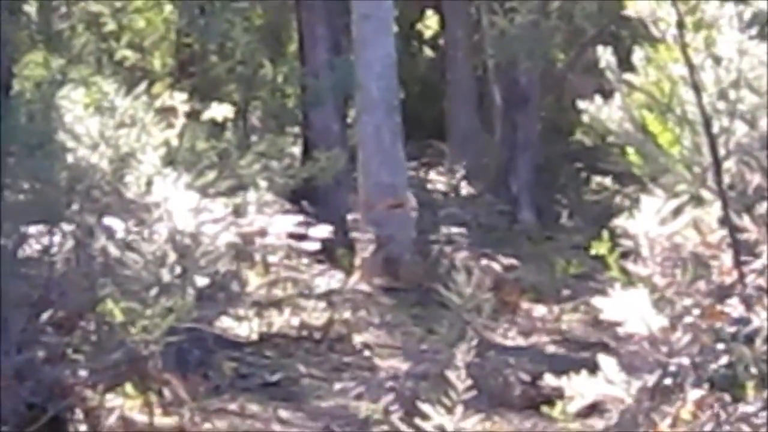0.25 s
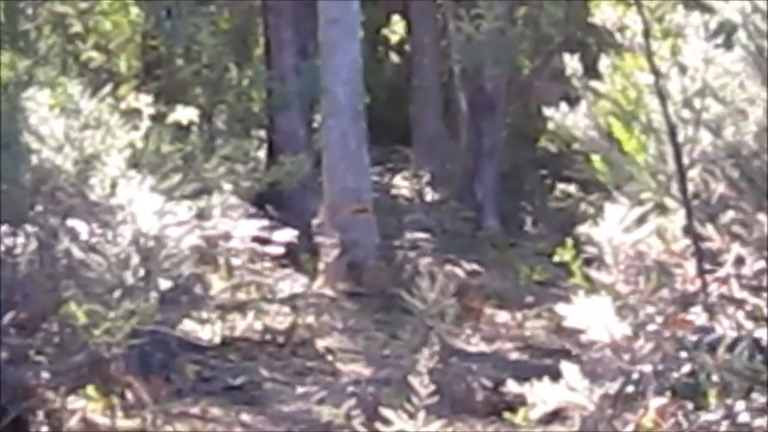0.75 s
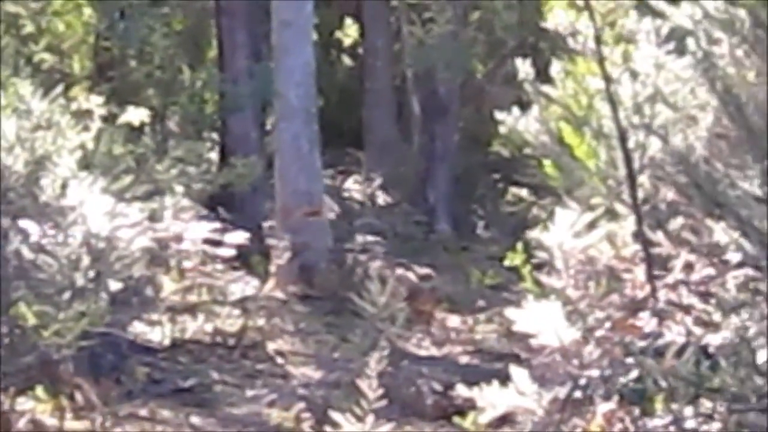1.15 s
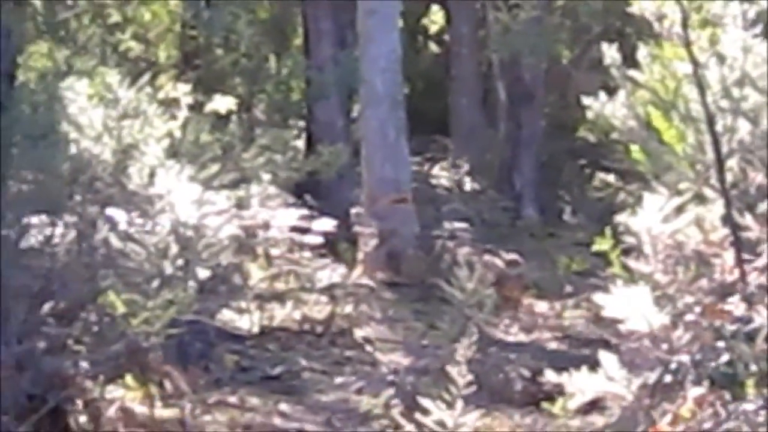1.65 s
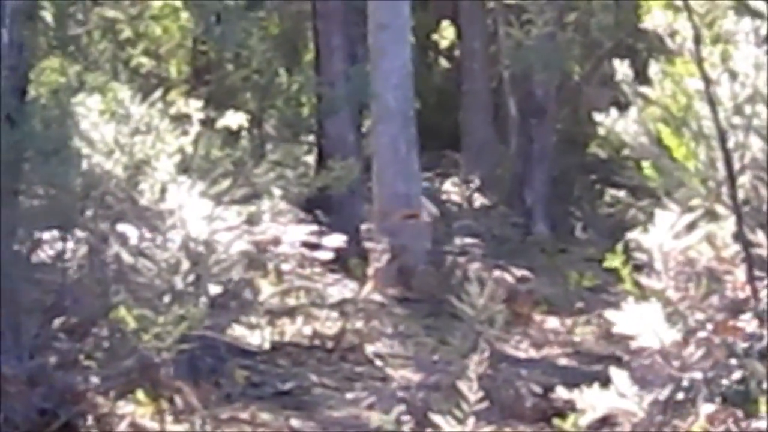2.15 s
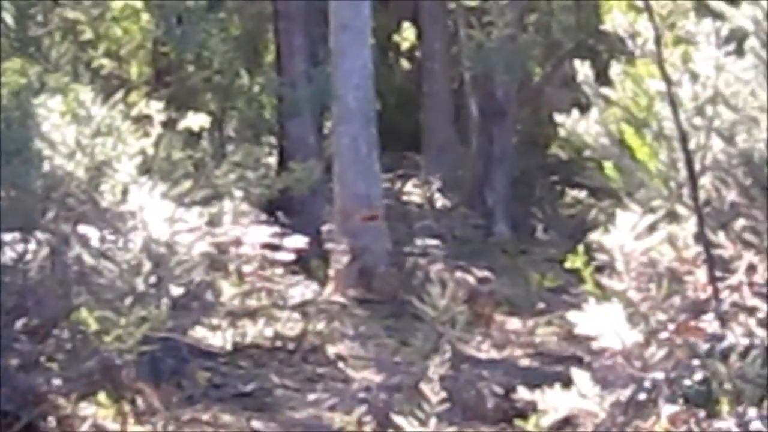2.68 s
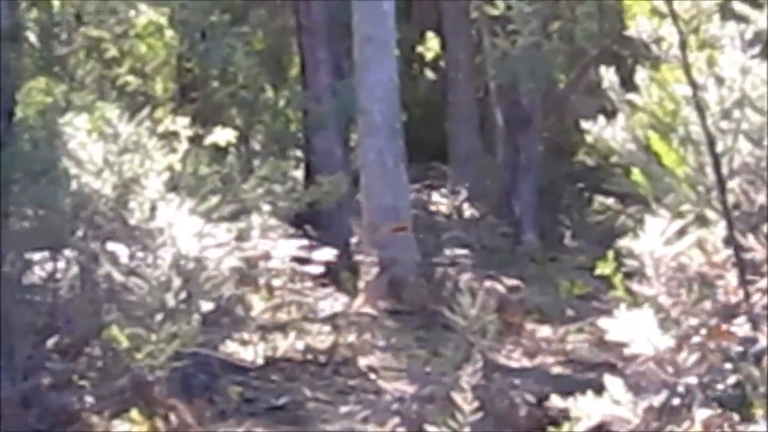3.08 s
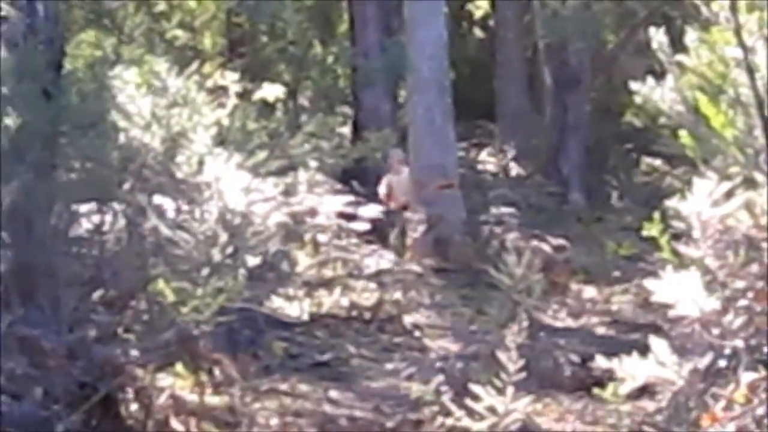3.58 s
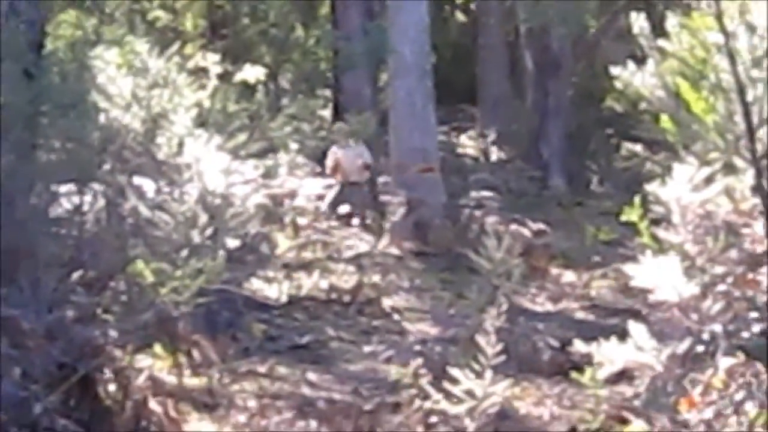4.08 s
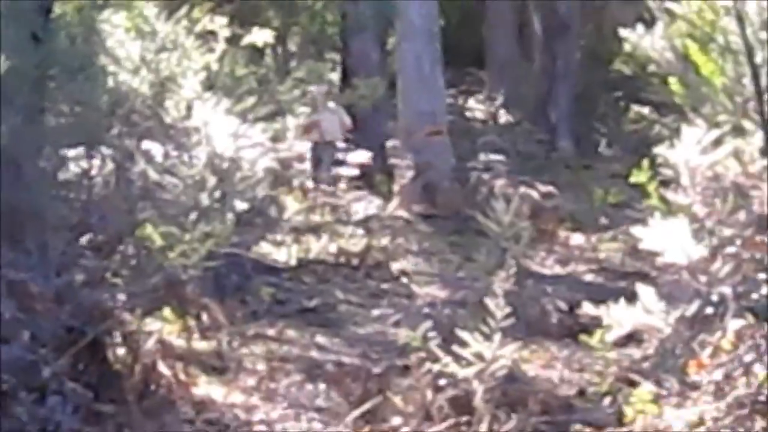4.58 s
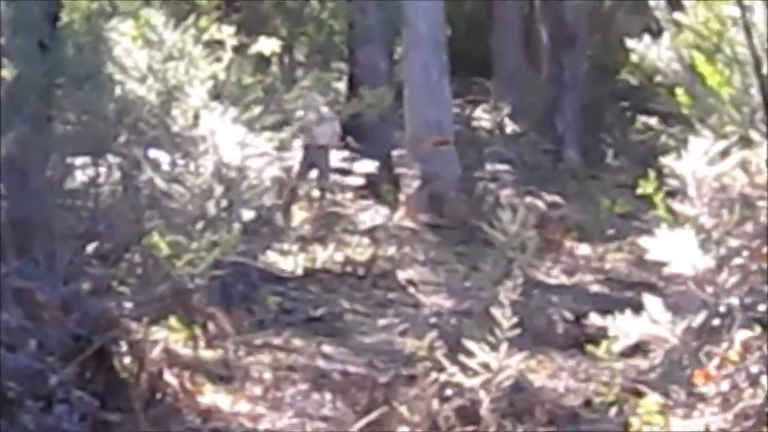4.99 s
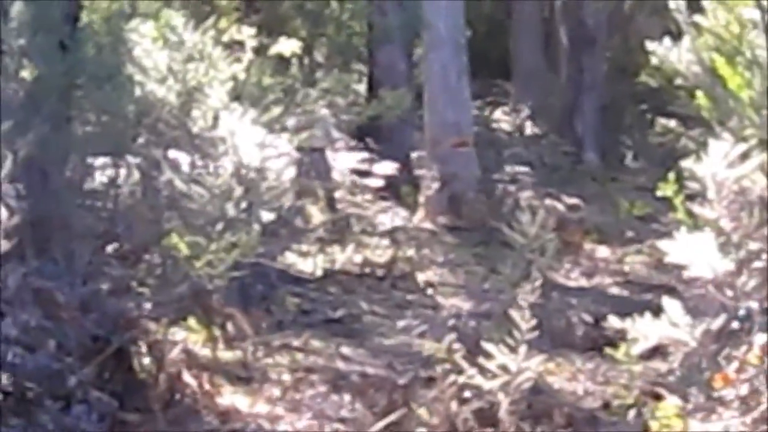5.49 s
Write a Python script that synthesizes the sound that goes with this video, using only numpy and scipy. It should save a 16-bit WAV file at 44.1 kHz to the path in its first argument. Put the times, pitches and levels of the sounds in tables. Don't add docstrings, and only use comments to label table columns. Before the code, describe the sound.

A steady, quiet wash of wind in the canopy and microphone hiss lies under the whole five and a half seconds. From the start a distant small bird sings thin, high falling two-note whistles, sagging slightly in pitch, several times a second, with a short gap near 2.3 seconds. At 0.3 seconds a sledge hits a steel wedge in a standing tree: a hard, dry, woody-metallic knock, slightly clipped, followed by a long scattered echo. A low warbling bird calls faintly around 0.8 to 1.2 seconds, in the echo. The second blow, the hardest, lands at 1.3 and the third at 2.3, with cracking fibres. Small snaps follow at 2.6, 2.9, 3.1 and 3.4 as the last echo fades. Around 4.1 seconds dry leaves crunch under a walker, with tiny twig clicks, lighter scuffs near 4.8 to 5.0 and a last tick near 5.4, the bird still singing.

```python
import sys
import numpy as np
from scipy import signal
from scipy.fft import rfft, irfft, next_fast_len
from scipy.io import wavfile
from scipy.ndimage import uniform_filter1d

SR = 44100
rng = np.random.default_rng(int(sys.argv[2]) if len(sys.argv) > 2 else 0)


def attenuation_scalar(level_db):
    decades = np.asarray(level_db, float) / 20
    return 10 ** decades


def inscribe(sig):
    pcm = np.round(np.clip(np.atleast_2d(sig).T, -1, 1) * 32767)
    wavfile.write(sys.argv[1], SR, pcm.astype(np.int16))


N = 253134


def unit(x):
    return x / np.sqrt(np.mean(x ** 2) + 1e-20)


def along(points, hz):
    f, v = np.transpose(points)
    return np.interp(np.log(hz + 1), np.log(f + 1), v)


def add(out, start_s, x):
    part = out[round(start_s * SR):][:len(x)]
    part += x[:len(part)]


def coloured(x, gain):
    m = next_fast_len(len(x) + 8192)
    return irfft(rfft(x, m) * gain(np.fft.rfftfreq(m, 1 / SR)), m)[:len(x)]


# frequency in Hz, level in dB per Hz.
AIR_COLOUR = [(15, -7.5), (28, 9), (70, -1), (276, -6), (500, -3.5), (1060, -5.5), (1870, -9),
              (3680, -13.5), (5370, -13.5), (6200, -15.5), (11500, -21), (12500, -19), (13300, -23),
              (15800, -25.5)]


def air(patchy_db, level_db=-53):
    z = signal.stft(rng.standard_normal(N), nperseg=512)[2]
    field = uniform_filter1d(rng.standard_normal(z.shape), size=6, axis=0)
    field = uniform_filter1d(field, size=14, axis=1)
    wash = signal.istft(z * attenuation_scalar(patchy_db * unit(field)), nperseg=512)[1][:N]
    return attenuation_scalar(level_db) * unit(coloured(wash, lambda hz: attenuation_scalar(along(AIR_COLOUR, hz))))


# time in seconds, peak in dB, swell in dB per s, fade in dB per s.
FOOTFALLS = [
    (4.1, -64, 30, 45),
    (4.088, -57, 700, 600),
    (4.79, -64, 150, 330),
    (4.97, -62, 55, 200),
]
# frequency in Hz, level in dB per Hz.
LITTER_COLOUR = [(1500, -43), (3000, -6), (4500, -4.5), (8500, -7.5), (11000, -17), (14000, -26.5)]


def rustle(per_s, spike_db):
    struck = rng.random(N) < per_s / SR
    cracks = struck * rng.standard_normal(N) * attenuation_scalar(spike_db * rng.exponential(size=N))
    grain = unit(coloured(cracks, lambda hz: attenuation_scalar(along(LITTER_COLOUR, hz))))
    t = np.arange(N) / SR
    level = np.zeros(N)
    for peak_s, db, swell, fade in FOOTFALLS:
        level += attenuation_scalar(db - np.where(t < peak_s, swell * (peak_s - t), fade * (t - peak_s)))
    return attenuation_scalar(5.0) * level * grain


# start in seconds, peak in dB, centre in Hz, width in octaves (the band spans
# 1.4 times this), decay in seconds (t60 is 4.4 times this).
TWIG_SNAPS = [(2.2532, -18.5, 1500, 1.7, 0.015), (2.253, -12, 3430, 0.38, 0.0021),
              (2.6485, -26.5, 5670, 0.67, 0.0035), (2.8996, -41, 10400, 0.21, 0.0055),
              (2.9, -44, 4000, .4, .006), (3.129, -37, 4730, 0.69, 0.0048),
              (3.4372, -27.5, 4450, 0.91, 0.0069), (3.4377, -33, 2200, 0.45, 0.0038),
              (3.9974, -52, 4500, 0.54, 0.0057), (4.038, -43, 4000, .6, 0.0046),
              (4.079, -43, 5000, 0.99, .006), (4.0872, -42, 7000, .9, .008), (4.095, -51, 4560, .8, .006),
              (4.151, -41, 5000, .8, .006), (4.1715, -45, 5000, .6, 0.0065), (4.7821, -51, 7000, .6, 0.013),
              (4.9325, -42, 5000, .8, .004), (4.9645, -42.5, 4020, 0.54, .01), (5.075, -47, 4500, .8, .006),
              (5.3737, -42, 7540, 0.3, 0.0082)]


def snaps():
    out, t = np.zeros(N), np.arange(SR // 25) / SR
    kicks = np.zeros(len(t))
    kicks[[0, 20, 68, 82]] = [-0.57, -2.2, -0.052, -1.0]
    for start_s, db, centre_hz, octaves, t60_s in TWIG_SNAPS:
        edges_hz = np.clip(centre_hz * 2 ** (octaves * np.array([-.7, .7])), 300, 15000)
        splinters = 0.3 * attenuation_scalar(-60 * t / (4.4 * t60_s)) * rng.standard_normal(len(t))
        band = signal.butter(3, edges_hz, "band", fs=SR, output="sos")
        burst = signal.sosfilt(band, kicks + splinters)
        add(out, start_s, attenuation_scalar(db) * burst / np.abs(burst).max())
    return out


def whistle(glide_hz):
    return np.sin(2 * np.pi * np.cumsum(glide_hz) / SR)


def note(length_s, top_hz, fall_hz, bend):
    u = np.linspace(0, 1, round(length_s * SR))
    return np.sin(np.pi * u) ** .7 * whistle(top_hz - fall_hz * u ** bend)


def warble(lead_s, held_s):
    lead_hz, crest_hz, drop_hz, trail_hz = 1600, 1850, 1470, 1280
    flick_s, trail_s, trail_db, faint_db = .006, .015, -10, -18
    s = np.cumsum([0, lead_s / 2, lead_s / 2, flick_s, held_s, flick_s, trail_s, trail_s])
    hz = [crest_hz, lead_hz, lead_hz, crest_hz, crest_hz, drop_hz, trail_hz, trail_hz - 100]
    db = [faint_db, -4, 0, -3, 0, -2.5, trail_db, faint_db]
    t = np.arange(0, s[-1], 1 / SR)
    return attenuation_scalar(np.interp(t, s, db)) * whistle(uniform_filter1d(np.interp(t, s, hz), size=120))


# start in seconds, high note in dB, delay to the low note in seconds, low note in dB.
SONG_NOTES = [(0.04, -60, 0.062, -56.5), (.19, -59, 0.07, -63), (.535, -62, 0.057, -56),
              (.705, -60, .058, -60), (0.873, -60, 0.059, -56), (1.043, -56, 0.066, -60),
              (1.203, -60, 0.1, -66), (1.556, -58, .058, -69), (1.714, -59, .055, -59),
              (1.888, -59.5, 0.068, -64), (2.074, -60, 0.093, -65), (2.769, -64, .077, -65),
              (2.947, -60, 0.075, -65), (3.13, -62, 0.061, -62), (3.303, -62, 0.075, -58),
              (3.487, -62.4, .073, -60.5), (3.667, -60.5, 0.07, -68), (3.849, -60, .074, -59),
              (4.033, -58, .078, -56), (4.207, -59.5, .08, -63), (4.396, -57, 0.068, -61),
              (4.571, -58.5, .08, -60), (4.772, -58, 0.072, -58), (4.956, -57, 0.064, -57.5),
              (5.14, -56, 0.073, -60), (5.326, -59.5, .074, -57.5), (5.505, -58.2, .082, -62)]
# time in seconds, high note start in Hz, low note start in Hz.
SONG_SAG = [(0, 6600, 6100), (.2, 5950, 5800), (.6, 6000, 5440), (1.2, 6000, 5300), (2, 5950, 5050),
            (3.5, 6020, 4920), (5.6, 5900, 4720)]


def two_note_song():
    out, (when_s, high_hz, low_hz) = np.zeros(N), np.transpose(SONG_SAG)
    vary, note_s = .25, .04
    reach = 1 + vary * rng.uniform(-1, 1, (len(SONG_NOTES), 4))
    for (start_s, high_db, gap_s, low_db), (a, b, c, d) in zip(SONG_NOTES, reach):
        high = note(note_s, np.interp(start_s, when_s, high_hz), fall_hz=a * 750, bend=b * .85)
        low = note(note_s, np.interp(start_s, when_s, low_hz), fall_hz=c * 650, bend=d * 2.2)
        add(out, start_s, attenuation_scalar(high_db + 4.0) * high)
        add(out, start_s + gap_s, attenuation_scalar(low_db + 4.0) * low)
    return out


# start in seconds, lead-in in seconds, crest held in seconds, level in dB.
WARBLES = [
    (.953, .028, .009, -48.5),
    (1.104, .017, .023, -49.5),
]
# start in seconds, length in seconds, start pitch in Hz, fall in Hz, level in dB.
LOW_NOTES = [
    (.842, .045, 1700, 450, -55),
    (1.178, .055, 1050, 10, -50),
]


def low_warbler():
    out = np.zeros(N)
    for start_s, lead_s, held_s, db in WARBLES:
        add(out, start_s, attenuation_scalar(db + 9.0) * warble(lead_s, held_s))
    for start_s, length_s, top_hz, fall_hz, db in LOW_NOTES:
        add(out, start_s, attenuation_scalar(db) * note(length_s, top_hz, fall_hz, bend=1))
    return out


def birds(close_db=-9, wet_db=-4):
    calls = two_note_song() + low_warbler()
    flutter = unit(coloured(rng.standard_normal(N), lambda hz: 1 / (1 + (hz / 70) ** 4)))
    t = np.arange(SR // 2) / SR
    tail = rng.standard_normal(len(t)) * attenuation_scalar(-60 * t / .6)
    thin = coloured(calls, lambda hz: 1 / (1 + (3000 / (hz + 1)) ** 4))
    wet = signal.fftconvolve(thin, tail / np.linalg.norm(tail))[:N]
    leaves = unit(rng.standard_normal(SR // 50)) / np.sqrt(SR // 50)
    close = signal.fftconvolve(calls, leaves)[:N]
    return calls * attenuation_scalar(2.2 * flutter - 2.0) + attenuation_scalar(close_db) * close + attenuation_scalar(wet_db) * wet


# frequency in Hz, level in dB per Hz.
ANSWER_COLOUR = [(30, -50), (99, -8.5), (297, 2), (570, -3.5), (730, -5), (1030, -3), (1400, -2),
                 (1750, -13), (2300, -11), (2950, -11), (3300, -20), (4800, -18.5), (6800, -23.5),
                 (15500, -47)]
# frequency in Hz, t60 in seconds.
NEAR_T60 = [(80, 0.33), (250, 0.49), (700, 0.64), (1500, 0.71), (3000, 1), (7000, 0.82), (12000, .4)]
# frequency in Hz, t60 in seconds.
FAR_T60 = [(100, 1.2), (250, 0.72), (450, 3), (1000, 2.51), (3000, 1.77), (8000, 1.2)]
# frequency in Hz, level in dB.
FAR_LEVEL = [(100, -32.5), (250, -19.5), (450, -16), (900, -10), (1400, -7.5), (3000, -6.5), (8000, -14.5)]
# frequency in Hz, time constant in seconds.
BUILD_UP = [(200, 0.0099), (1200, 0.0027), (3000, 0.01445), (8000, 0.016)]


def echo_gain(hz, t):
    near = attenuation_scalar(-60 * t / along(NEAR_T60, hz))
    far = attenuation_scalar(along(FAR_LEVEL, hz) - 60 * t / along(FAR_T60, hz))
    return attenuation_scalar(along(ANSWER_COLOUR, hz)) * np.hypot(near, far) * (1 - np.exp(-t / along(BUILD_UP, hz)))


def scatter(noise, sparse_db, fills_s):
    hz, t, z = signal.stft(noise, SR, nperseg=256)
    hz = hz[:, None]
    thin = attenuation_scalar(sparse_db / (1 + (hz / 1800) ** 4) / (1 + (t / fills_s) ** 4))
    return signal.istft(z * thin * echo_gain(hz, t), SR, nperseg=256)[1][:len(noise)]


# delay in seconds, frequency in
# Hz, level over the scattered echo in dB.
CLEAR_TRUNKS = [(0.021, 2490, 6.5), (0.021, 720, 8.5), (0.0234, 530, 3.5), (0.0584, 467, 1.5),
                (0.0369, 291, 4.5), (0.045, 1350, 0), (0.0519, 260, 3.5), (0.0753, 2220, 2),
                (0.0798, 380, 2), (0.0808, 1380, 1), (0.0838, 150, 2), (0.1098, 420, 2.5), (0.114, 980, 3),
                (0.1482, 2310, 4), (0.1864, 1190, 2), (0.1941, 234, 5.5), (0.204, 1760, 7),
                (0.2277, 290, 9.5), (0.2554, 400, 3.5), (0.2918, 680, 9), (0.3652, 1110, 5),
                (0.3861, 4000, 2)]


def trunks(turns, lift_db):
    out = np.zeros(SR)
    for delay_s, hz, db in CLEAR_TRUNKS:
        half_s = .002 + turns / hz
        t = np.arange(-2 * half_s, 2 * half_s, 1 / SR)
        size = echo_gain(hz, delay_s) * attenuation_scalar(db + lift_db) * np.sqrt(hz / SR)
        packet = np.exp(-2 * (t / half_s) ** 2) * np.sin(2 * np.pi * (hz * t + rng.random()))
        add(out, max(delay_s - 2 * half_s, 0), size * packet)
    return out


# frequency in Hz, level in dB, t60 in seconds, rise in seconds.
WEDGE_MODES = [(185, -17, .04, .0015), (1120, 19.5, .0036, .00075), (1330, 20, .007, .003),
               (1400, -11, .04, .003), (2190, 11.7, .0146, .0011), (2900, -6.8, .0075, .00012),
               (4250, 5.3, .003, .00032), (5100, -20, .003, .00005), (5720, -25, .003, .00006),
               (7600, -24, .003, .00015)]


def knock(t):
    t = np.maximum(t, 0)
    out = np.zeros(len(t))
    for hz, db, t60_s, rise_s in WEDGE_MODES:
        out += attenuation_scalar(db - 60 * t / t60_s) * (1 - np.exp(-t / rise_s)) ** 2 * np.sin(2 * np.pi * hz * t)
    return out


# start in seconds, strength in dB.
SLEDGE_BLOWS = [
    (.3051, -1),
    (1.27187, .6),
    (2.26337, .3),
]
# fibre crack in dB, echo in dB, treble echo in dB.
BLOW_AFTERMATH = [
    (-18, -22, 1),
    (-14, -20.5, 0.64),
    (-16.5, -20.5, 0.5),
]
# frequency in
# Hz, width in Hz, lift in dB.
STEEL_RINGS = [
    [(2310, 303, 4.5), (3760, 115, 1.5), (4970, 300, 2), (6500, 280, 6)],
    [(2390, 239, 4.5), (3600, 350, 5), (4890, 45, 8.5), (4700, 470, 5.5), (6980, 200, 1)],
    [(2450, 250, 0), (3630, 490, 3.5), (4930, 260, 1), (6630, 400, -3)],
]
# frequency in Hz, width in # Hz, lift in dB (negative for a dip).
BOLE_RINGS = [(45, 60, -12.5), (742, 88, 7), (1039, 60, 4.5), (1340, 90, -2), (1960, 100, 2.5)]
# delay in seconds, share.
GROUND_COPY = (.00046, -.97)


def sledge():
    out, t = np.zeros(N), np.arange(SR // 5) / SR
    ground_s, ground_share = GROUND_COPY
    direct = knock(t) + ground_share * knock(t - ground_s)
    fixed, clear = rng.standard_normal(3 * SR), trunks(turns=2.2, lift_db=5.0)

    def same(hz):
        return 1 / (1 + (hz / 2600) ** 3)

    def fibre_colour(hz):
        return (hz / 3500) ** 2 / (1 + (hz / 4500) ** 6)

    for (start_s, db), (crack_db, echo_db, treble_db), rings in zip(SLEDGE_BLOWS, BLOW_AFTERMATH, STEEL_RINGS):
        add(out, start_s, attenuation_scalar(db) * direct)
        fibres = unit(coloured(rng.standard_normal(len(t)), fibre_colour))
        add(out, start_s, attenuation_scalar(crack_db - 60 * t / 0.017) * (1 - np.exp(-t / 0.0002)) * fibres)

        def ring_gain(hz):
            peaks = [lift_db / (1 + (2 * (hz - ring_hz) / width_hz) ** 2)
                     for ring_hz, width_hz, lift_db in rings + BOLE_RINGS]
            return attenuation_scalar(sum(peaks))

        fresh = coloured(rng.standard_normal(3 * SR), lambda hz: np.sqrt(1 - same(hz) ** 2))
        noise = coloured(coloured(fixed, same) + attenuation_scalar(treble_db) * fresh, ring_gain)
        add(out, start_s, attenuation_scalar(echo_db + 11.5) * scatter(noise, sparse_db=0, fills_s=0.31))
        add(out, start_s, attenuation_scalar(echo_db + 13) * clear)
    return out


def scene():
    return (sledge() + birds() + snaps() + rustle(per_s=6000, spike_db=1.2) + air(patchy_db=1.02))[None]


def roll_off(x):
    return signal.sosfilt(signal.butter(12, 16530, fs=SR, output="sos"), x)


def record(dry):
    top_hz, edge_hz = 15850, 16500
    rumble_cut = signal.butter(2, 55, "high", fs=SR, output="sos")
    heard = signal.sosfilt(rumble_cut, coloured(dry[0], lambda hz: hz < top_hz))
    clipped = heard / (1 + np.abs(heard) ** 7) ** (1 / 7)
    mix = coloured(clipped, lambda hz: np.clip((edge_hz - hz) / (edge_hz - top_hz), 0, 1))
    return roll_off(mix[None])


dry = scene()
out = record(dry)
inscribe(out)
```